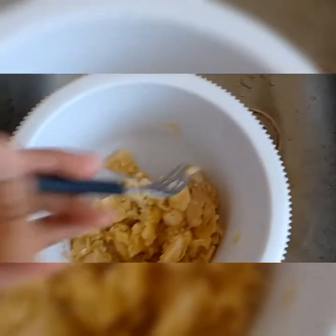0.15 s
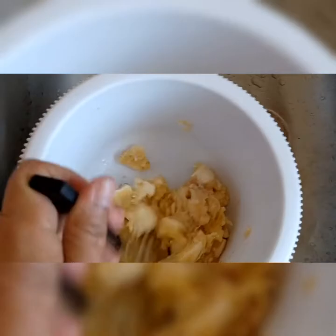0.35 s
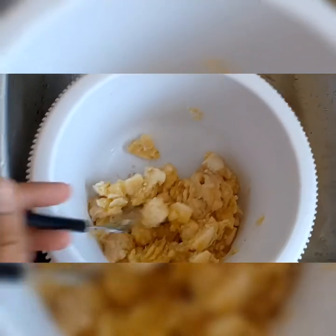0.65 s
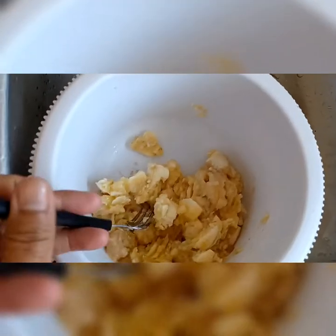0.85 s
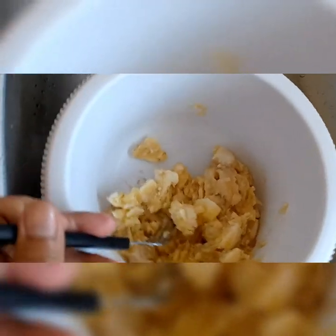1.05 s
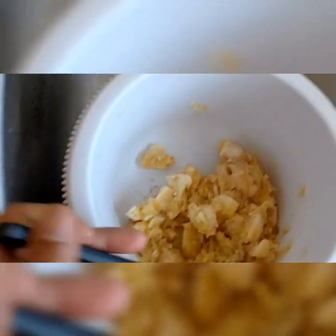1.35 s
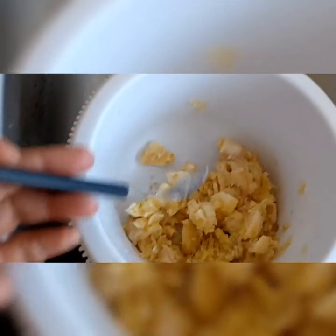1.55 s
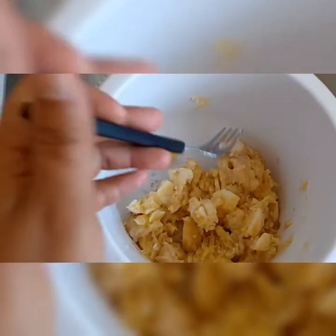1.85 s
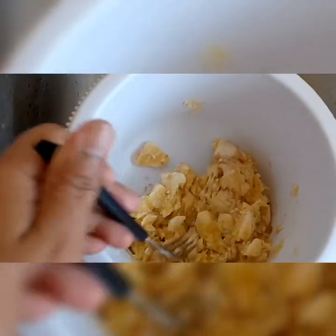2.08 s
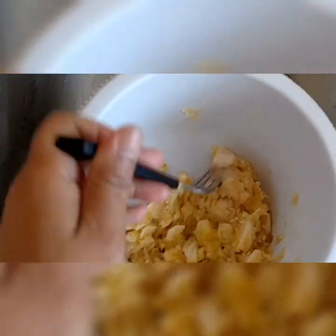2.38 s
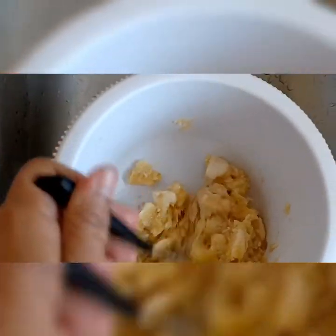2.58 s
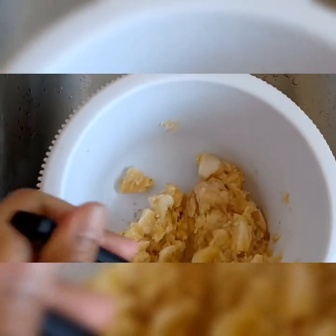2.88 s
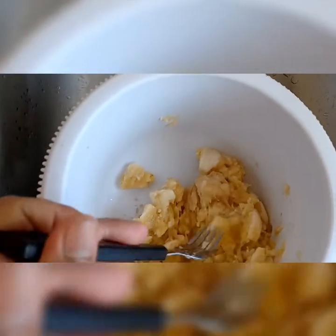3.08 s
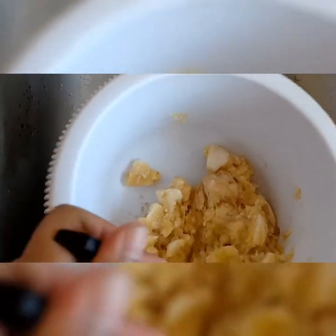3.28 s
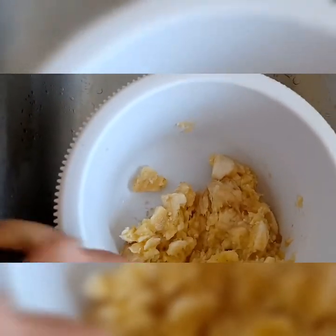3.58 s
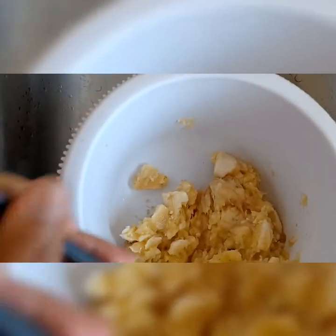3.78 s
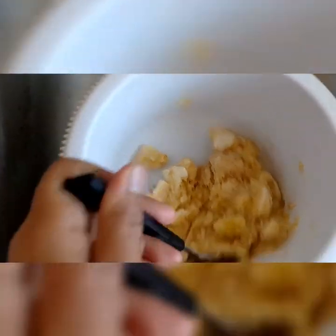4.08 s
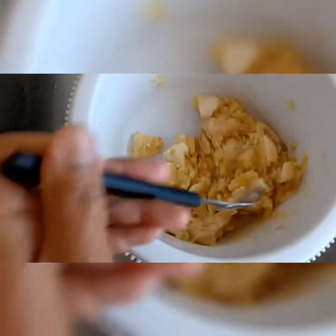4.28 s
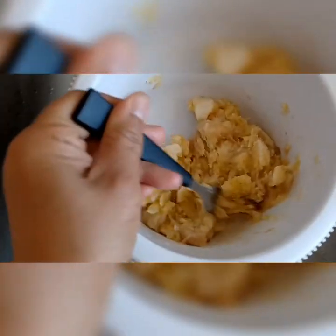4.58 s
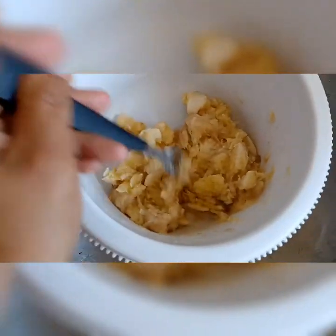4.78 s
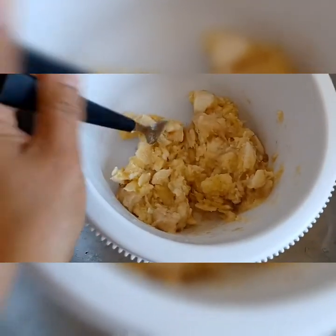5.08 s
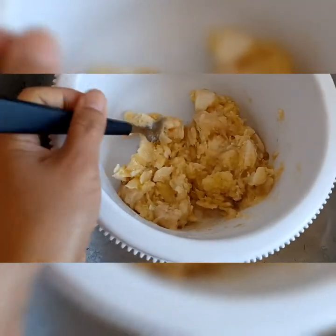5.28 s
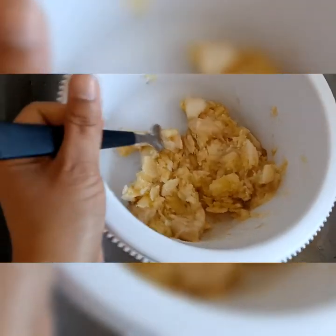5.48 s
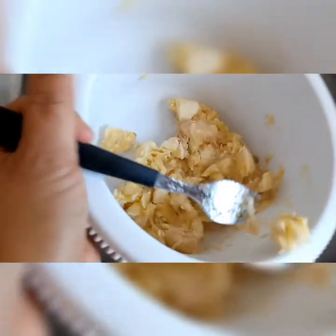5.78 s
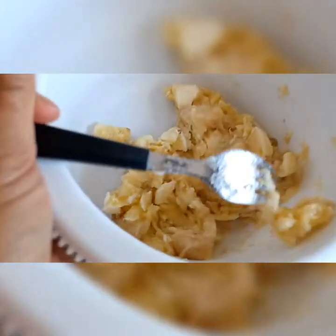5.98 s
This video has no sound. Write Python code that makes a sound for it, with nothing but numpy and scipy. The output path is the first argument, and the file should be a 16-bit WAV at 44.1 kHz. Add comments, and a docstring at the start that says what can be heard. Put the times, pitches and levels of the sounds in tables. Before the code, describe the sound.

Heard close in a small, lightly echoing kitchen, a fork mashes ripe banana in a plastic bowl in a steel sink. A wet rasp swells immediately, with a clack and deep bumps at 0.1-0.2 s. A sharp clack lands at 0.75, then a softer scrape from 1.0 to 1.35 with short hollow, gliding hoots as tines judder. After a lull, a quick hoot and squish come at 2.15; then near quiet. A strong rasp and boom hit at 2.85, softer scraping follows at 3.0, and a rasp with clack and thud at 3.4. The loudest hoots, with wet smacks and rasping, come at 4.1-4.3. More pressing at 4.7 ends in a strong squelch at 4.86; a clack and bump follow at 5.1, faint scraping at 5.4-5.7, and light clacks at 5.7-5.8. Faint hiss continues beneath a low hum that dips, then swells.

```python
"""A rasp swells at once as a fork mashes ripe banana in a plastic bowl in a steel kitchen sink, heard close.
Random slips and air-pocket pops, filtered by bowl resonances, make the rasp; torn pulp smacks in click bursts.
Chattering tines clack on the wall, and stick-slip judder drives gliding sines as a hoot of the bowl's floor.
Bumps of the bowl boom through decaying modes of the sink; decaying noise gives the kitchen's echo,
and a soft hiss and a low hum that fades, then swells, lie under the work."""
import sys
import numpy as np
from scipy import signal
from scipy.io import wavfile
from scipy.ndimage import uniform_filter1d

SR = 44100
rng = np.random.default_rng(int(sys.argv[2]) if len(sys.argv) > 2 else 0)


def transcribe(u):
    """Save the signal u as a 16-bit wav file named by the first command-line argument.

    u: samples, shape (n,) or (channels, n), limited to [-1, 1]; the rate is SR.
    q: integer samples, one column per channel.
    """
    v = np.clip(np.atleast_2d(u).T, -1, 1)
    q = np.round(v * 32767).astype(np.int16)
    wavfile.write(sys.argv[1], SR, q)


N = 270774  # length [samples]
TIME = np.arange(N) / SR  # [s]

# Strokes of the fork through the pulp; the levels are trimmed per register when mixed:
# (start [s], attack [s], hold [s], overall level [dB], wet fizz re overall [dB], bowl body re overall [dB])
FORK_STROKES = [(0.0, 0.074, 0.021, -26, -7, -3.5), (0.158, 0.018, 0.014, -31, -9, 2),
                (0.439, 0.027, 0.032, -49, -2.5, 3.5), (1.018, 0.028, 0.31, -37.5, -4, 2),
                (2.148, 0.012, 0.011, -35, -2.5, -2), (2.704, 0.028, .09, -54.5, 0.5, 8.5),
                (2.826, 0.024, 0.0068, -25, -8.5, 0.5), (2.975, 0.025, 0.2, -44, -6, 3),
                (3.409, 0.04, 0.0069, -26, -6.5, 2.5), (3.672, 0.053, 0.011, -46, -5.5, 1),
                (4.092, 0.062, 0.041, -31, -6.5, -2), (4.223, .055, 0.051, -28.5, -3.5, 0),
                (4.675, 0.071, 0.11, -32.5, -6.5, -3), (5.43, 0.021, .26, -42.5, -8.5, -4),
                (5.752, 0.033, 0.31, -68.5, -6, -1.5)]
# Resonances of fork and bowl under the stroke, about which they wander:
# (centre [Hz], nominal width [Hz], mean level [dB])
CONTACT_RESONANCES = [(390, 75, 6.5), (624.7, 14, 4), (1240, 60, -4), (1748, 100, -1), (3030, 12, -3),
                      (3630, 140, -3.5), (4590, 57, 0), (5010, 36, 1)]
# Pulp bursts or lets go of the tines:
# (time [s], level [dB], fizz re level [dB], body re level [dB], decay constant [s])
PULP_SMACKS = [(0.067, -38, 9.5, 0, 0.007), (0.379, -53, -7, -9.5, 0.0045),
               (0.473, -39, -10.5, -1.5, 0.015), (0.591, -51.5, -6, 6, 0.037), (.793, -34, -0.5, 9, 0.016),
               (0.956, -51, -0.5, 10.5, 0.03), (1.038, -42.5, 1, -3, 0.014),
               (1.082, -40.5, 8.5, -1.5, 0.0062), (1.556, -56.5, -4.5, 7, 0.0032),
               (2.157, -35, 2, 10, 0.0098), (2.258, -47.5, 2.5, 6, 0.0071), (2.626, -59, 7, -6, 0.013),
               (2.685, -55, -29, -14, 0.0063), (2.727, -46, 4.5, 3, .014), (3.005, -36.5, -7.5, 4, 0.012),
               (3.379, -43.5, -2, -3, 0.016), (3.674, -46, 0, 5, 0.025), (3.724, -44, -6, 6.5, 0.014),
               (3.942, -48.5, -2.5, -3, 0.051), (4.113, -30.5, 4.5, 12.5, 0.011),
               (4.864, -25, -2.5, -2.5, 0.0084), (5.357, -46, -3.5, 2.5, 0.019)]
# The fork strikes the wall; the ring is offset for each of its two modes:
# (time [s], level [dB], edge re level [dB], pitch of the spot [Hz], relative ring [dB], chatter time [s])
WALL_CLACKS = [(0.105, -24, -18, 1257, -13.5, 0.021), (.7425, -17.5, -26, 1400, -20, .016),
               (1.055, -30.5, -20, 1287, -10.5, .014), (2.031, -50, -6, 813, -16.5, 0.012),
               (2.837, -29.5, -25, 1012, -6, .016), (3.422, -18.5, -15, 1062, -17.5, 0.021),
               (3.882, -30, 2.5, 1288, 1.5, 0.014), (4.262, -25, -6, 730, -4, 0.014),
               (5.112, -20.5, -12.5, 784, -31, 0.0089), (5.378, -34.5, -18, 1310, -15, 0.01),
               (5.72, -32.5, -7.5, 993, -25, .01), (5.824, -30, -8.5, 1530, -22, 0.016)]
# The tines judder over the plastic: (time [s], mean level [dB], mean slip rate [1/s], length before decay [s])
TINE_JUDDERS = [(0.603, -32, 383, 0.024), (0.963, -41, 377, 0.048), (1.116, -31.5, 398, 0.14),
                (1.233, -19, 415, 0.014), (1.339, -22, 450, 0.038), (2.154, -17, 441, 0.028),
                (2.436, -67, 590, 0.12), (3.134, -31, 420, 0.061), (3.721, -31, 436, 0.024),
                (4.108, -13.5, 455, 0.02), (4.256, -15, 426, 0.015), (4.658, -38, 400, 0.0034),
                (4.749, -21, 407, 0.0061)]
# The bowl bumps on the sink: (time [s], level [dB], added level of the upper modes [dB])
BOWL_BUMPS = [(.103, -9, -12.5), (0.179, -13, -7), (.477, -36, 3), (.632, -23.5, -7.5), (0.74, -29, -2.5),
              (1.128, -29, 0), (1.233, -27, -14), (2.041, -40, 0), (2.159, -29.5, -1), (2.755, -32, -6),
              (2.865, -13, -6), (3.002, -18.5, -12), (3.35, -40.5, -9), (3.43, -12, -5), (3.683, -30, -3),
              (4.033, -32.5, -16), (4.113, -17.5, -1.5), (4.291, -22.5, -10), (4.402, -32, -5),
              (4.7, -34, -8), (4.861, -35.5, -3), (5.114, -19, -16), (5.298, -33.5, -8.5),
              (5.502, -27.5, -7.5)]
# Modes of the sink floor: (frequency [Hz], mean level [dB], t60 [s])
SINK_MODES = [(88, -27, 0.69), (123.3, -2, 0.18), (121.06, -23, 1), (126, -5, 0.072), (214.9, -1.5, 0.19),
              (314, -1, 0.11)]
# Modes of the bowl's wall: (frequency [Hz], mean relative level [dB], t60 [s])
WALL_MODES = [(440, 3.5, 0.032), (610, -3, 0.038), (1030, -18.5, 0.04), (1045, -13.5, 0.051),
              (1261, -3, 0.015), (1618, -6, 0.19), (1914, -3, 0.074)]
# Colour of rubbing on the bowl: (frequency [Hz], relative density level [dB])
RUBBING_COLOUR = [(88, -23), (150, 5), (264, -4), (422, -3.5), (514, -6), (960, -12), (1260, -13.5),
                  (1420, -15.5), (1830, -12.5), (2700, -20), (3770, -16), (5680, -22.5), (8230, -42),
                  (13400, -31.5), (16000, -43.5)]
# The kitchen's reverberation time: (frequency [Hz], t60 [s])
ECHO_T60 = [(100, 0.65), (450, .5), (1500, 0.4834), (4000, 0.48), (8000, 0.5), (15000, 0.36)]
# The kitchen's echo strength: (frequency [Hz], level [dB])
ECHO_LEVEL = [(100, -7.5), (250, -4.5), (450, -9), (1500, -6.5), (4000, -7.5), (8000, -13.5),
              (15000, -12.5)]
# Colour of the quiet kitchen: (frequency [Hz], relative density level [dB])
QUIET_COLOUR = [(30, -9), (60, 7.5), (120, -3.5), (250, -4), (600, -8), (1500, -23.5), (2600, -18.5),
                (3300, -2.5), (4300, -15), (5300, -14.5), (7500, -30), (16000, -23)]
# Strength of the faint hum, which fades, then swells: (time [s], level [dB])
HUM_LEVEL = [(0, -72.5), (1.9, -81.5), (4.5, -58.5), (6.1, -55)]

# Every push swells, leans in slowly while it is held, then eases off.
SWELL_DB, LEAN_DB_PER_S, EASE_DB_PER_S = 20, 11, 241.5
# Before a push the tines feel their way into the pulp with a faint sticky crackle.
APPROACH_S, TICKS_PER_S, TICK_DB = 0.14, 430, -69
CLACK_FIZZ_DB = -12  # relative to the edge of the clack
HOOT_T60_S = 0.1  # the bowl's floor rings on after the last slip
HUM_HZ = 120  # upper of two hum tones; the weaker lies an octave below
EDGE_HZ = 16150  # upper band limit


def strokes():
    """Granular friction: many small slips and pops, in clumps, excite resonances as the hand pushes."""
    grains = evened(slips(per_s=9000, spread_db=4, size=N)) + amp(-3) * bubbles(per_s=14, cycles=5)
    grains *= amp(2 * drift(per_s=110, size=N))  # clumping
    body, rasp, fizz = map(evened, registers(in_bowl(grains, ring_db=-19.5)))

    hollow = np.zeros(N)
    for hz, width, db in CONTACT_RESONANCES:
        path = hz + 45 * drift(per_s=11, size=N)  # wanders as the contact moves
        once = resonate(grains, path, 2 * width)
        rung = evened(resonate(once, path, 2 * width))
        level_db = db + 3.5 * drift(per_s=22, size=N)
        hollow += amp(level_db) * rung

    low_ring, high_ring = map(evened, registers(hollow)[:2])
    body = evened(body + amp(-2) * low_ring)
    rasp = evened(rasp + amp(-5) * high_ring)

    out = np.zeros(N)
    for start, attack, hold, level_db, fizz_db, body_db in FORK_STROKES:
        age = TIME - start
        touch = np.clip(age / 0.0065, 0, 1)  # short fade-in at first contact
        contact = touch * amp(level_db + push(attack, hold, age))
        grain_mix = amp(-3.5) * rasp + amp(fizz_db - 2.9) * fizz + amp(body_db - 3.0) * body
        out += contact * grain_mix
    return out


def push(attack, hold, t):
    """Envelope of a driving force: level in dB at age t as the hand swells, holds and eases off."""
    swell = SWELL_DB * (np.clip(t / attack, 0, 1) - 1)
    lean = LEAN_DB_PER_S * np.clip(t - attack, 0, hold)
    ease = EASE_DB_PER_S * np.maximum(t - attack - hold, 0)
    return swell + lean - ease


def bubbles(per_s, cycles, count=30, size=1024):
    """Bubble resonance: air pockets of many sizes pop in the pulp, each a tiny decaying, rising blip."""
    out, t = np.zeros(N), TIME[:size]
    for hz in np.geomspace(600, 14000, count):
        age = t * hz / cycles  # in decay constants
        rise = 1 + .03 * np.minimum(age, 3)
        blip = np.exp(-age) * np.sin(2 * np.pi * cycles * age * rise)
        pops = slips(per_s=per_s * np.sqrt(hz / 1000), spread_db=4, size=N)
        out += signal.oaconvolve(pops, blip * hz ** 0.51)[:N]
    return evened(out)


def ticks():
    """Adhesive contact: sparse sticky ticks grow as the tines near the pulp before a push."""
    near = sum(np.interp(TIME, [start - APPROACH_S, start], [0, 1], right=0) for start, *_ in FORK_STROKES)
    clicks = slips(per_s=TICKS_PER_S, spread_db=2, size=N)
    _, rasp, fizz = map(evened, registers(in_bowl(clicks, ring_db=-19)))
    return np.sqrt(near) * amp(TICK_DB) * (rasp + amp(-4.5) * fizz)


def smacks(size=6000):
    """Tearing: wet pulp parts in a burst of random clicks that rises fast and decays exponentially."""
    out, t = np.zeros(N), TIME[:size]
    for s, db, fizz_db, body_db, length in PULP_SMACKS:
        envelope = (1 - np.exp(-t / (0.097 * length))) * np.exp(-t / length)
        burst = slips(per_s=14000, spread_db=1.5, size=size) * envelope
        parts = peaked(registers(in_bowl(burst, ring_db=-12.5)))
        add(out, s, amp(db + np.array([body_db, 0, fizz_db])) @ parts)
    return out


def clacks(size=12000):
    """Impact: the first steel tine lands on plastic, the others chatter after it, and the wall rings."""
    out, t = np.zeros(N), TIME[:size]
    for s, db, edge_db, hz, ring_db, chatter in WALL_CLACKS:
        blow = 0.13 * slips(per_s=7800, spread_db=2.5, size=size) * np.exp(-(t / chatter) ** 1.7)
        blow[0] = 1  # the first tine
        spot = [(hz / 4, -5), (hz / 2.0, -4), (hz, 0), (hz * 1.7, -4)]  # favours modes near this pitch
        parts = peaked(registers(colour(in_bowl(blow, ring_db=-20), spot)))
        strike = amp([0, edge_db, edge_db + CLACK_FIZZ_DB]) @ parts
        spot_modes = [(hz, ring_db + 10, .08), (hz * 1.43, ring_db - 2.5, .04)]
        add(out, s, amp(db) * (strike + ring(spot_modes, t, vary_db=2.5)))
    return out


def judders(size=12000):
    """Stick-slip: the tines slip at a nearly even rate and drive the bowl's floor into a brief hoot."""
    out, t = np.zeros(N), TIME[:size]
    for s, db, hz, length in TINE_JUDDERS:
        slip_rate = hz * (1 + 0.023 * drift(per_s=150, size=size))
        phase = 2 * np.pi * np.cumsum(slip_rate) / SR
        overtones = sum(np.sin(k * phase) for k in range(2, 6))
        upper_mode = drift(per_s=140, size=size) * np.sin(1.6 * phase)  # shaken unevenly by the slips
        hoot = np.sin(phase) + amp(-25) * overtones + amp(-15.5) * upper_mode
        decay = amp(-60 * np.maximum(t - length, 0) / HOOT_T60_S)
        swing = (1 - np.exp(-t / .0025)) * decay
        add(out, s, amp(db + 1.3 * drift(per_s=130, size=size)) * swing * hoot)
    return out


def bumps(size=30000):
    """Modal excitation: the bowl lands on the booming sink; each landing has its own share of upper modes."""
    out, t = np.zeros(N), TIME[:size]
    for s, db, upper_db in BOWL_BUMPS:
        modes = [(hz, mode_db + upper_db * (hz > 170), t60) for hz, mode_db, t60 in SINK_MODES]
        onset = 1 - np.exp(-t / 0.0027)
        add(out, s, amp(db) * onset * ring(modes, t, vary_db=4.0))
    return out


def kitchen(x, count=6):
    """Diffuse echo: lows use one decaying-noise tail; highs crossfade among several, for a smooth tail."""
    low = signal.sosfiltfilt(signal.butter(4, 1450, fs=SR, output="sos"), x)
    turn = TIME * 450  # tails begun so far, overlapping in half-sine shares
    shares = (np.sin(np.pi / 2 * np.minimum((turn - k) % count, 2)) for k in range(count))
    return echo(low) + sum(echo((x - low) * share) for share in shares)


def echo(x):
    """Reverberation: dense reflections from hard walls, each band decaying at its own rate."""
    taps = rng.standard_normal(SR) * np.clip(TIME[:SR] / 0.0063 - .4, 0, 1)  # delayed onset
    hz, t, z = signal.stft(taps, SR, nperseg=256)
    t60 = read(ECHO_T60, hz)[:, None]
    even_energy = np.sqrt(np.log(10 ** 6) / (t60 * SR))  # offsets the energy of a longer decay
    z *= amp(read(ECHO_LEVEL, hz)[:, None] - 60 * t / t60) * even_energy
    return signal.fftconvolve(x, signal.istft(z, SR, nperseg=256)[1])[:N]


def quiet():
    """Background noise: filtered random hiss and two hum tones an octave apart that fade, then swell."""
    hiss = amp(-72.0) * evened(colour(rng.standard_normal(N), QUIET_COLOUR))
    tones = np.sin(2 * np.pi * HUM_HZ * TIME) + amp(-12.5) * np.sin(np.pi * HUM_HZ * TIME)
    hum = amp(np.interp(TIME, *np.transpose(HUM_LEVEL))) * tones
    return hiss + hum


def in_bowl(x, ring_db, size=8192):
    """Modal radiation: a click comes straight and also rings the bowl's wall."""
    wall = ring(WALL_MODES, TIME[:size], vary_db=4.5)
    rung = signal.oaconvolve(x, wall / np.linalg.norm(wall))[:len(x)]
    return colour(x + amp(ring_db) * rung, RUBBING_COLOUR)


def ring(modes, t, vary_db):
    """Modal decay: a sum of dying sines whose shares vary at random, as with the spot struck."""
    out = 0
    for hz, db, t60 in modes:
        level_db = db + vary_db * rng.standard_normal() - 60 * t / t60
        out = out + amp(level_db) * np.sin(2 * np.pi * hz * t)
    return out


def resonate(x, hz, width):
    """Tuned resonance of gain 1: shifts the moving centre hz to zero, smooths, and shifts back."""
    turn = np.exp(2j * np.pi * np.cumsum(hz) / SR)
    r = np.exp(-np.pi * width / SR)
    return 2 * (turn * signal.lfilter([1 - r], [1, -r], x / turn)).real


def slips(per_s, spread_db, size):
    """Random impulses: a train of tiny clicks of either sign, a few of them large."""
    chance = rng.random(size)
    sign = rng.choice([-1, 1], size)
    height = rng.exponential(1, size)
    return (chance < per_s / SR) * sign * amp(spread_db * np.minimum(height, 4))


def drift(per_s, size):
    """Slow random variation: straight lines join normal random knots, per_s of them a second."""
    knots = rng.standard_normal(size)
    return np.interp(np.arange(size) * per_s / SR, np.arange(size), knots)


def registers(x):
    """Band division: splits a sound into body, rasp and fizz."""
    thin = signal.sosfilt(signal.butter(1, 420, "high", fs=SR, output="sos"), x)  # small contacts: little bass
    edges = [(2400, "low"), ((2400, 8000), "band"), (8000, "high")]  # [Hz]
    return np.array([signal.sosfilt(signal.butter(4, hz, kind, fs=SR, output="sos"), thin) for hz, kind in edges])


def colour(x, points, size=4096):
    """Minimum-phase filtering: a causal filter with the given spectrum."""
    log_gain = np.log(amp(read(points, abs(np.fft.fftfreq(size, 1 / SR)))))
    taps = np.fft.ifft(np.exp(np.conj(signal.hilbert(log_gain)))).real
    return signal.oaconvolve(x, taps[:size // 2])[:len(x)]


def read(points, hz):
    """Interpolation of a table on a log-frequency axis."""
    f, value = np.transpose(points)
    return np.interp(np.log(hz + 1), np.log(f + 1), value)


def peaked(x, size=128):
    """Short-time normalization: scales each row so that its loudest 3 ms have rms 1."""
    return x / np.sqrt(uniform_filter1d(x ** 2, size).max(-1, keepdims=True) + 1e-20)


def evened(x):
    """Power normalization: scales to rms 1."""
    return x / np.sqrt(np.mean(x ** 2) + 1e-20)


def amp(db):
    """Logarithmic level: decibels to amplitude gain."""
    return 10 ** (np.asarray(db) / 20)


def add(mix, s, sound):
    """Superposition: adds a sound into the mix at time s."""
    part = mix[max(round(s * SR), 0):][:len(sound)]
    part += sound[:len(part)]


def scene():
    """Superposition of the fork's direct sound, its echo and the quiet of the room."""
    near = strokes() + ticks() + smacks() + clacks() + judders() + bumps()
    return (near + kitchen(near) + quiet())[None]


def record(dry):
    """Band limiting: the microphone sheds deep bass, then a lowpass removes the top."""
    thinned = signal.sosfilt(signal.butter(4, 48, "high", fs=SR, output="sos"), dry)
    lowpass = signal.firwin(511, EDGE_HZ, window=("kaiser", 9), fs=SR)
    return signal.oaconvolve(thinned, lowpass[None], "same")


dry = scene()
out = record(dry)
transcribe(out)
```